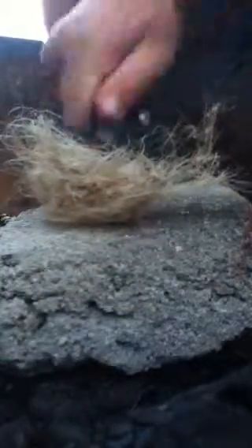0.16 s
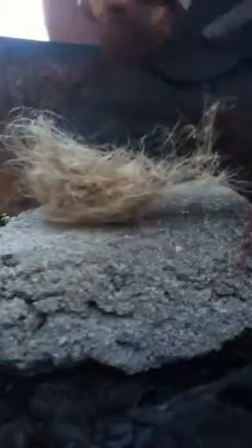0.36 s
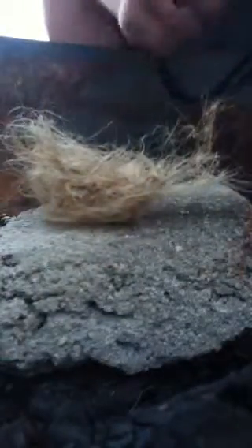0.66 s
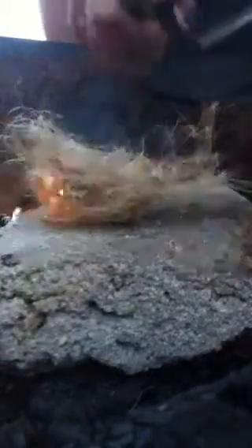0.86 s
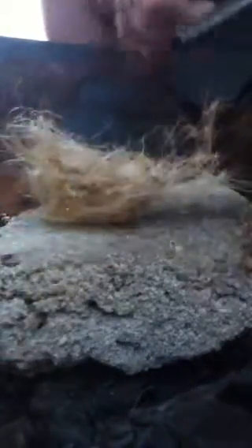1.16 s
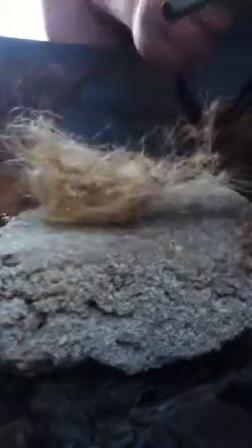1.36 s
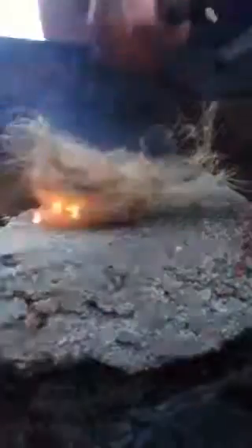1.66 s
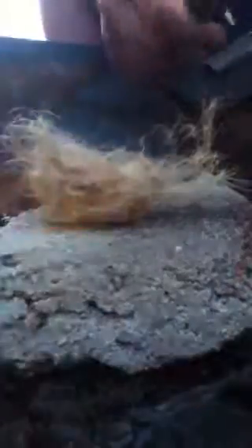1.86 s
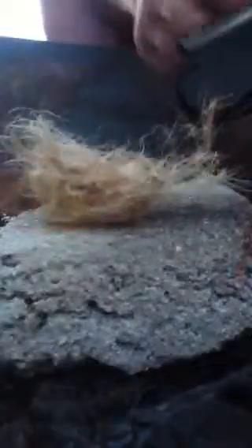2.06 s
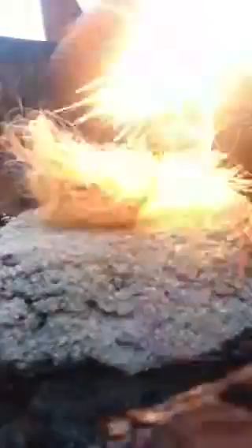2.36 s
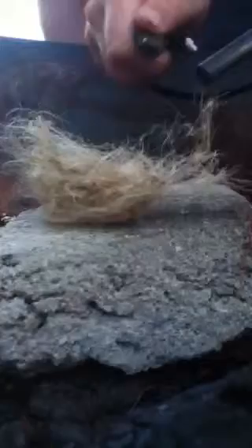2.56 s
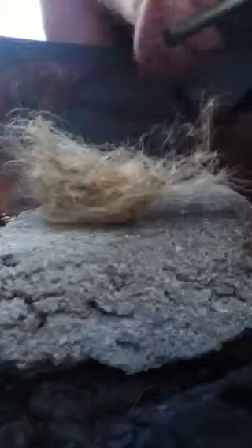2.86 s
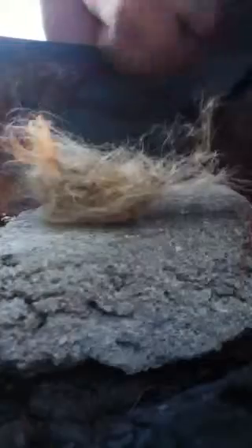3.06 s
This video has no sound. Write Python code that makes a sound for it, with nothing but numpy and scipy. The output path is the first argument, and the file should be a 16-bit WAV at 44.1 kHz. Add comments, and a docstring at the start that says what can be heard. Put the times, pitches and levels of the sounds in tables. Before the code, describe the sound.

A metal striker rasps along a fire rod four times, close to a phone outdoors; the first stroke is weaker, later ones flare and pop with sparks, with light metallic taps between, over faint low traffic.

```python
"""A steel striker scrapes a fire rod hard four times, close to a phone outdoors: dense stick-slip
clicks ring the rod and the striker and tear off grit. Between strokes the striker slides back softly,
and taps as it is set on the rod. Shavings flare with low puffs of noise and sharp pops; the grip knocks dully.
Behind them: rumbling traffic and a brief tyre hiss (shaped noise), a faint hum (narrow noise)
and one far bird (a falling tone made hoarse)."""
import sys
import numpy as np
from scipy import signal
from scipy.fft import rfft, irfft
from scipy.io import wavfile
from scipy.ndimage import uniform_filter1d

SR = 44100
rng = np.random.default_rng(int(sys.argv[2]) if len(sys.argv) > 2 else 0)


def digitize_waveform(pressure):
    """Quantize a signal to 16-bit integers and store it at the path in sys.argv[1].

    Rows of a 2-D input are taken as channels; values are limited to [-1, 1].
    """
    field = np.atleast_2d(pressure).T
    bounded = np.clip(field, -1, 1)
    quanta = np.round(bounded * 32767).astype(np.int16)
    wavfile.write(sys.argv[1], SR, quanta)


def invert_db(level):
    """Linear amplitude ratio for a level in decibels (20 dB per decade), elementwise."""
    return 10 ** (np.asarray(level, dtype=float) / 20)


N = 141120  # length in samples (3.2 s)

# rings of the hand-held rod and striker, before damping or weighting:
# pitch_hz, level_db, t60_s (time to fade by 60 dB), rod (1 = rod, 0 = striker)
RING_MODES = [(1600, -16, .01, 0), (2060, -5, .014, 1), (2350, -14, .012, 0), (2950, -7, .015, 0),
              (3700, -19, .01, 0), (4600, -18, .009, 0), (5250, -14, .013, 0), (5640, -4, .017, 1),
              (6800, -5, .008, 0), (7550, 1, .008, 0), (8750, -10, .01, 0), (10390, -11, .018, 1),
              (11750, -12, .009, 0), (13700, -13, .007, 0)]
# colour of the unpitched tearing: frequency_hz, level_db (per Hz)
GRIT_COLOUR = [(590, -42), (1000, -57.5), (1610, -9.5), (2940, -15), (4520, -7), (5130, -3), (8550, 3.5),
               (12100, -0.5), (16000, -9)]
LOW_HZ = 3400  # rings below this count as low


def secs(n):
    """Time in seconds of each of n samples."""
    return np.arange(n) / SR


def unit(x):
    """Scale to an rms of 1."""
    return x / np.sqrt(np.mean(x ** 2))


def colour(x, table, lo=20, hi=22000):
    """Shape the spectrum by (frequency_hz, level_db) points and keep only lo to hi."""
    freq = np.maximum(np.arange(len(x) // 2 + 1) * SR / len(x), 1)
    points = np.array(table)
    gain_db = np.interp(np.log(freq), np.log(points[:, 0]), points[:, 1])
    return irfft(rfft(x) * invert_db(gain_db) * (freq >= lo) * (freq < hi), len(x))


def walk(rate):
    """Random values, rate of them a second, smoothed twice to wander with an rms of 1."""
    hold = int(SR / rate)
    values = np.repeat(rng.standard_normal(N // hold + 1), hold)
    smooth = uniform_filter1d(uniform_filter1d(values, hold), hold)
    return unit(smooth[:N])


def add(out, start_s, x):
    """Mix a short sound into out, cut off at the end."""
    i = int(start_s * SR)
    out[i:i + len(x)] += x[:N - i]


def thin(x):
    """Small things radiate little bass, so a high-pass removes it."""
    return signal.sosfilt(signal.butter(4, 1250, "high", fs=SR, output="sos"), x)


def ring(damp=1):
    """Each mode answers a blow with a fading sine, one mode per row; damp scales the fade time."""
    hz, db, t60, _ = np.array(RING_MODES).T[:, :, None]
    t = secs(2048)
    return invert_db(db) * np.sin(2 * np.pi * hz * t) * np.exp(-np.log(1000) * t / (damp * t60))


def scrape():
    """Dense stick-slip bites drive the rings unevenly as the edge travels and tear grit; deep bites sound lower."""
    # contact of each hard stroke, one list per stroke:
    # time_s, level_db, dig_db (how much deep bites favour the low part)
    strokes = [
        [(.247, -75, 6), (.257, -47.5, 1), (.269, -34.5, -6.5), (.285, -42, 5), (.293, -31, 8.5),
         (.298, -32, 14.5), (.305, -28, 6.5), (.313, -35, 6), (.318, -62, 28)],
        [(.866, -74, -24), (.873, -41.5, -3), (.886, -32.5, -9), (.9, -24, 6), (.905, -14.5, -16),
         (.915, -19.5, -4), (.936, -29, 7.5), (.946, -34.5, 0.5), (.965, -47, 0.5), (.991, -36.5, -0.5),
         (.996, -99, 40), (1.01, -50, -10), (1.04, -72, 13)],
        [(1.643, -70, 11), (1.66, -27, -17), (1.671, -42.5, 3), (1.676, -24, -7), (1.691, -18.5, -0.5),
         (1.702, -22, -1), (1.715, -25.5, 0), (1.725, -31, -0.5), (1.753, -34.5, -4.5), (1.762, -48.5, 5),
         (1.786, -47, -3), (1.791, -73, 22), (1.812, -44.5, -6), (1.822, -63, 6), (1.855, -59.5, 5)],
        [(2.495, -86, -10), (2.501, -35.5, -4), (2.516, -44, -3), (2.522, -27, 2.5), (2.542, -13.5, -4),
         (2.554, -26.5, 4.5), (2.561, -57, 4), (2.575, -38.5, 1.5), (2.584, -57, 0), (2.62, -56.5, 3)],
    ]
    # light slides back along the rod: start_s, length_s, level_db (of the high part)
    slides = [(0.663, 0.061, -46.5), (1.418, 0.042, -50), (1.451, 0.041, -49.5), (2.258, 0.014, -77),
              (2.995, 0.036, -50.5)]
    bites_per_s, bite_spread_db, flutter_db = 16000, 2.2, 1.8
    travel_db, slide_dig_db = 4, -9
    low_ring_db, high_ring_db = 2, -3  # rings compared with the grit
    pressed_t60_share = 0.7  # the pressed edge damps the rings
    rod_scraped_db = -10  # scraping along the rod barely bends it

    t, hz = secs(N), np.array(RING_MODES)[:, 0]
    high, low = np.zeros(N), np.zeros(N)
    for rows in strokes:
        s, db, dig_db = np.array(rows).T
        high += invert_db(np.interp(t, s, db, -150, -150))
        low += invert_db(np.interp(t, s, db + dig_db, -150, -150))
    for s, length, db in slides:
        fade_in, fade_out = (t - s) / 0.018, (s + length - t) / 0.0041
        slide = invert_db(db) * np.clip(np.minimum(fade_in, fade_out), 0, 1)
        high += slide
        low += invert_db(slide_dig_db) * slide

    # clicks at random moments, of random sign and strength
    happens = rng.random(N) < bites_per_s / SR
    strength = invert_db(bite_spread_db * rng.exponential(size=N))
    sign = np.sign(rng.standard_normal(N))
    bites = unit(happens * sign * strength * invert_db(flutter_db * walk(350)))

    modes = ring(pressed_t60_share) * invert_db(rod_scraped_db * np.array(RING_MODES)[:, 3:])
    parts = ((low, "low", hz < LOW_HZ, low_ring_db), (high, "high", hz > LOW_HZ, high_ring_db))
    out = 0
    for contact, kind, pick, ring_db in parts:
        drive = bites * contact
        rings = 0
        for mode in modes[pick]:
            # each ring wanders in strength on its own
            rings = rings + signal.oaconvolve(drive * invert_db(travel_db * walk(60)), mode)[:N]
        split = signal.butter(4, LOW_HZ, kind, fs=SR, output="sos")
        grit = signal.sosfilt(split, colour(drive, GRIT_COLOUR))
        mix = invert_db(ring_db) * unit(rings) + unit(grit)
        out = out + np.std(drive) * unit(mix)  # as strong as the drive
    return out


def taps():
    """Each tap is a short noisy crack plus rings, weighted by where the edge lands."""
    # striker set down on the rod, levels before the bass is thinned:
    # start_s, level_db (peak of the rings), rod_db, low_striker_db, high_db (weights of the rings)
    tap_events = [(0.2889, -8.5, 3.5, -11, 12), (0.6758, -2.5, -2.5, -18, -1), (1.4112, -12.5, 7, -8, 2.5),
                  (2.2937, -14.5, -2.5, -2.5, -27), (2.988, -6, -6, -19, 0)]
    high_from_hz, scatter_db = 9500, 2
    crack_db, crack_fade_s = -13, 0.0004  # crack level compared with the rings

    out, (hz, _, _, rod) = np.zeros(N), np.array(RING_MODES).T
    for s, db, rod_db, low_db, high_db in tap_events:
        place_db = rod_db * (rod > .5) + low_db * (hz < LOW_HZ) * (rod < .5) + high_db * (hz > high_from_hz)
        body = invert_db(place_db + scatter_db * rng.standard_normal(len(hz))) @ ring()
        crack = colour(rng.standard_normal(2048), GRIT_COLOUR) * np.exp(-secs(2048) / crack_fade_s)
        tap = body / abs(body).max() + invert_db(crack_db) * crack / abs(crack).max()
        add(out, s, invert_db(db) * tap)
    return out


def sparks():
    """Showers flare as low puffs of noise; burning sparks pop as sharp pressure pulses with a fizz."""
    # flare of each spark shower: peak_s, level_db, rise_s, fall_s
    puffs = [(.92, -22, 0.012, 0.022), (1.698, -20, 0.0044, 0.013), (2.545, -18, 0.008, 0.0084)]
    # colour of the puffs: frequency_hz, level_db
    puff_colour = [(40, -8), (100, -6.5), (210, 5.5), (350, -7), (520, -3), (800, -19.5), (1100, -15.5)]
    # burning sparks pop: start_s, level_db (of the pulse before the bass is thinned)
    pops = [(.515, -33), (0.9628, -12), (0.9686, -12), (0.9784, -10), (.9885, -32), (1.0085, -23.5),
            (1.0275, -29), (1.7289, -5), (1.7558, -1.5), (1.7765, -30), (1.7971, -23), (1.815, -26),
            (1.839, -29.5), (2.2746, -32.5), (2.57, -10.5), (2.606, -24), (2.61, -26)]
    pop_s, fizz_db, fizz_fade_s = 0.00006, -19, 0.0012

    out, t, k = np.zeros(N), secs(N), secs(512)
    air = unit(colour(rng.standard_normal(N), puff_colour))
    for s, db, rise, fall in puffs:
        swell = np.exp(-.5 * ((t - s) / np.where(t < s, rise, fall)) ** 2)
        out += invert_db(db) * air * swell
    pulse = (1 - k / pop_s) * np.exp(-k / pop_s)  # jumps one way, then dips the other
    for s, db in pops:
        fizz = invert_db(fizz_db) * rng.standard_normal(512) * np.exp(-k / fizz_fade_s)
        add(out, s, -invert_db(db) * thin(pulse + fizz))
    return out


def knocks():
    """The grip knocks dully: a sine that swells and dies within a few cycles."""
    # knocks of the grip: start_s, level_db (roughly the peak), pitch_hz
    grip_knocks = [(.6856, -24.5, 2340), (.7245, -34.5, 770)]
    out, k = np.zeros(N), secs(1024)
    for s, db, hz in grip_knocks:
        swell_and_fade = k * hz / 1.2 * np.exp(1 - k * hz / 1.07)
        add(out, s, invert_db(db) * np.sin(2 * np.pi * hz * k) * swell_and_fade)
    return out


def bird():
    """A falling tone, blurred by distance into a hoarse band of noise."""
    # one far call gliding down: time_s, pitch_hz, level_db (before the blur)
    call = [(.525, 4250, -66), (.54, 4300, -58), (.565, 3750, -57), (.59, 3250, -56), (.628, 3000, -56),
            (.638, 2950, -75)]
    s, hz, db = np.array(call).T
    pitch = np.interp(secs(N), s, hz)
    tone = np.sin(2 * np.pi * np.cumsum(pitch) / SR)
    blur = walk(900)
    return invert_db(np.interp(secs(N), s, db, -150, -150)) * blur * tone


def noise_band(hz, width_hz):
    """Noise gathered around one pitch, 3 dB down at the edges of its width."""
    far, near = 2 * width_hz, width_hz / 2
    shape = [(hz - far, -40), (hz - near, -3), (hz, 0), (hz + near, -3), (hz + far, -40)]
    return unit(colour(rng.standard_normal(N), shape))


def town():
    """Traffic noise whose lower octaves waver separately, a wavering hum and a passing tyre hiss."""
    # colour of the traffic: frequency_hz, level_db (before the overall level)
    traffic_colour = [(12, -32), (20, -1.5), (81, -3), (113, -3.5), (154, -6), (228, -7), (262, -13.5),
                      (367, -20), (513, -24), (718, -22), (825, -25.5), (1400, -28), (2260, -38),
                      (14700, -51), (16000, -77)]
    traffic_db, hum_db, hiss_db = -38.5, -58, -54.5
    hiss_peak_s, hiss_spread_s = 1.83, 0.14

    noise, traffic = rng.standard_normal(N), 0
    for low_edge in 20 * 2. ** np.arange(11):
        waver_db = (0.4 * walk(2.256) + 0.39 * walk(6.9)) * (low_edge < 2000)
        traffic = traffic + colour(noise, traffic_colour, low_edge, 2 * low_edge) * invert_db(waver_db)
    hum = invert_db(hum_db + walk(2.94)) * noise_band(741, 8)
    swell = np.exp(-.5 * ((secs(N) - hiss_peak_s) / hiss_spread_s) ** 2)
    hiss = invert_db(hiss_db) * noise_band(1550, 420) * swell
    return invert_db(traffic_db) * unit(traffic) + hum + hiss


def scene():
    """All the sources added together in one channel."""
    metal = thin(scrape() + taps())
    mix = metal + sparks() + knocks() + bird() + town()
    return mix[None]


def low_pass(x):
    """Removes everything above the highest recorded frequency."""
    return signal.sosfilt(signal.butter(12, 17070, fs=SR, output="sos"), x)


def record(dry):
    """The phone rounds the highest peaks and cuts the top of the treble."""
    rounded = np.tanh(dry)
    top_cut = signal.ellip(8, .2, 28, 15800, fs=SR, output="sos")
    mix = signal.sosfilt(top_cut, rounded)
    return low_pass(mix)


dry = scene()
out = record(dry)
digitize_waveform(out)
```